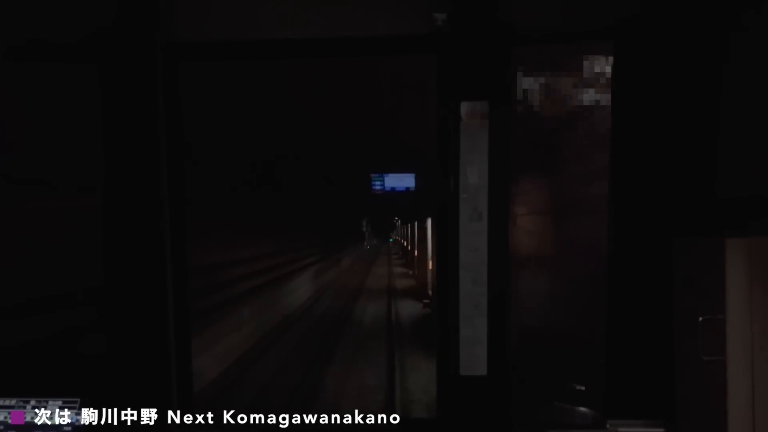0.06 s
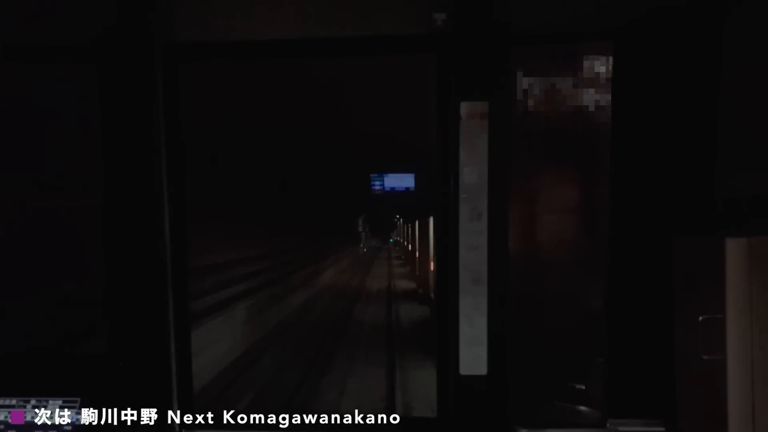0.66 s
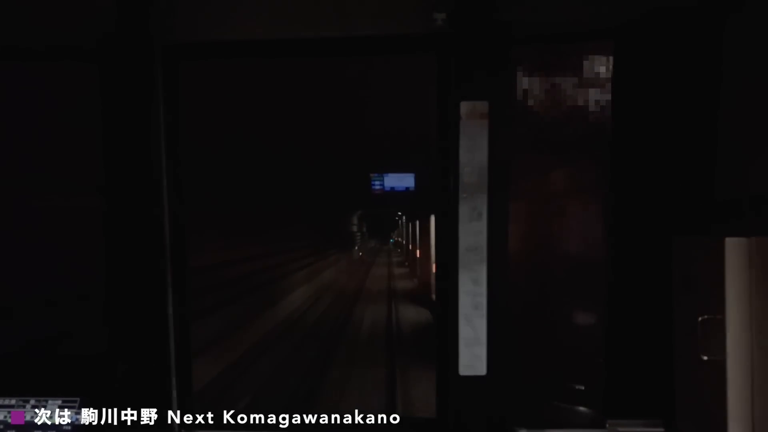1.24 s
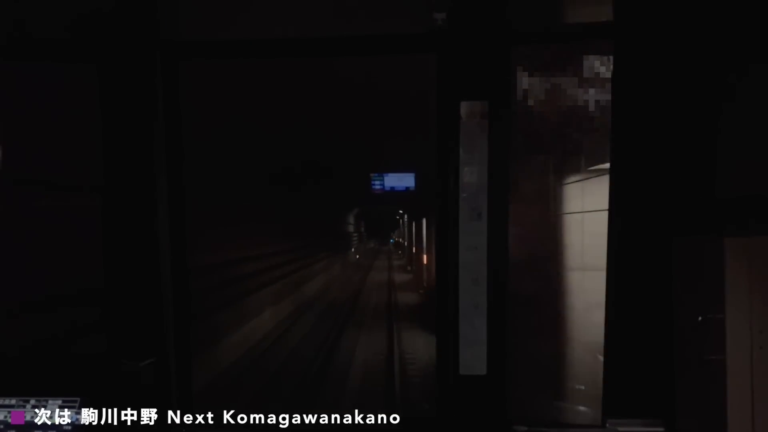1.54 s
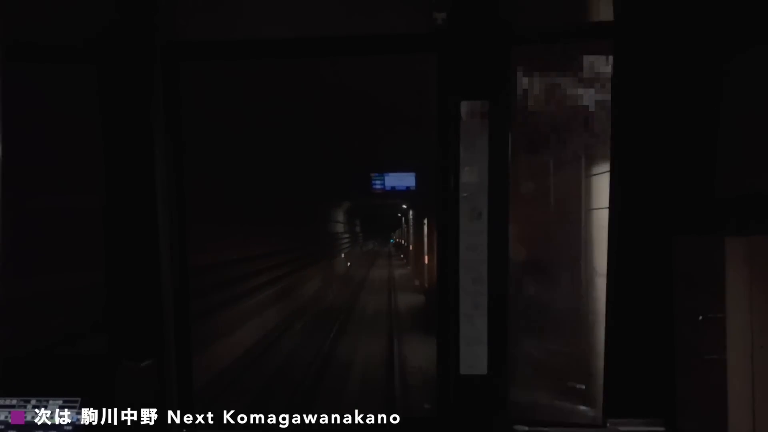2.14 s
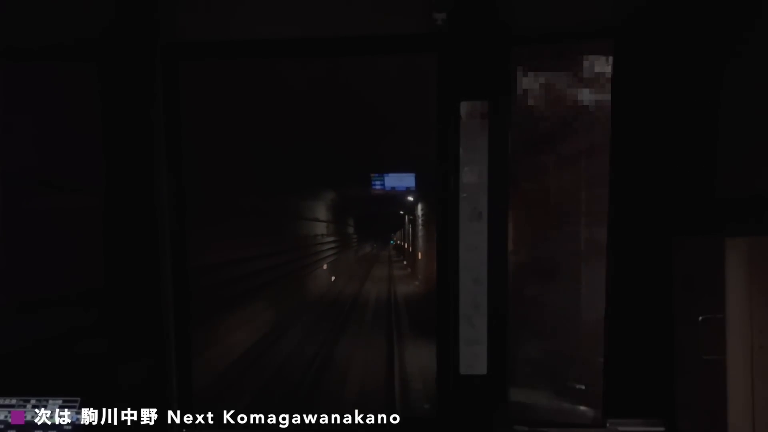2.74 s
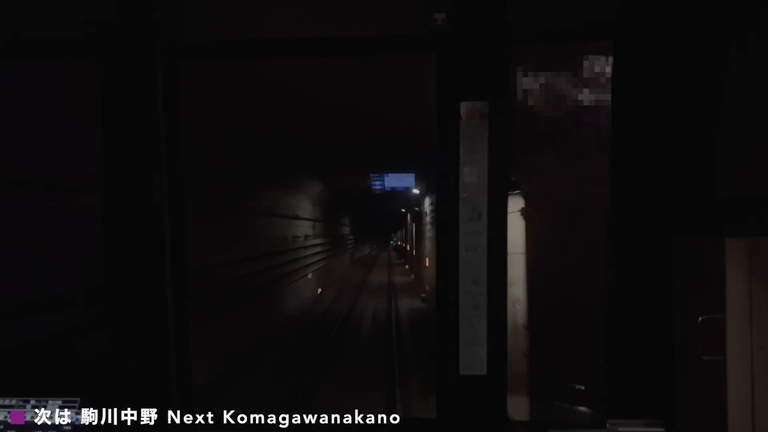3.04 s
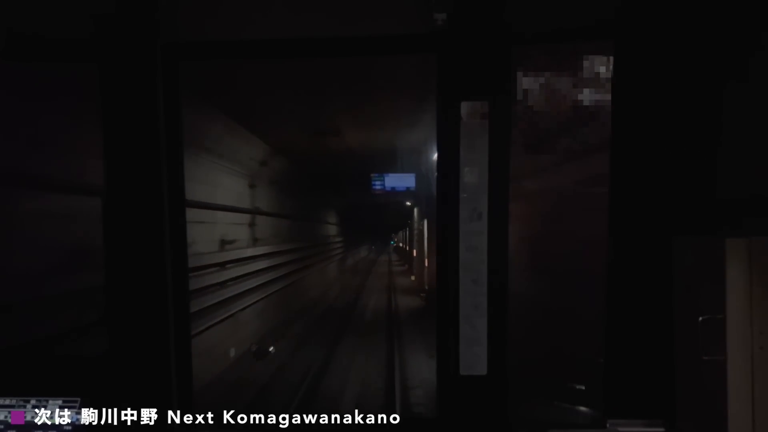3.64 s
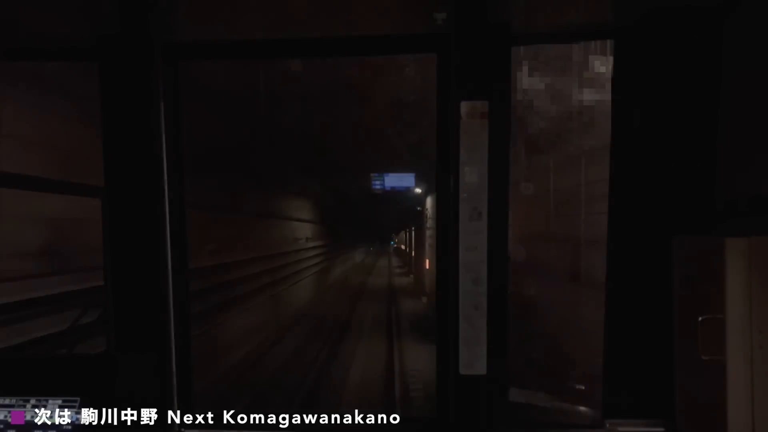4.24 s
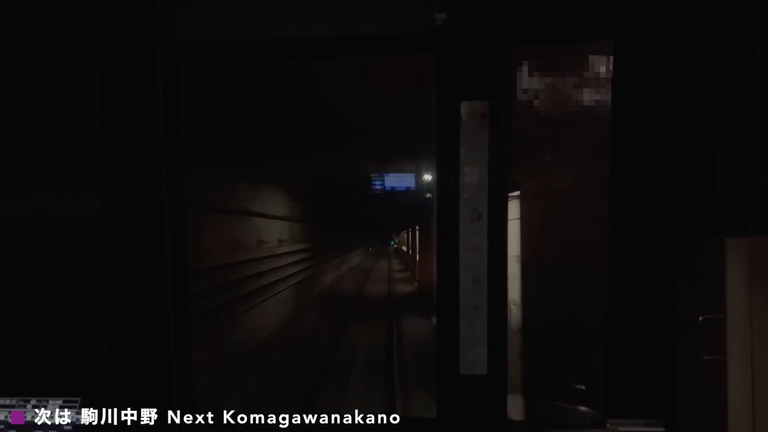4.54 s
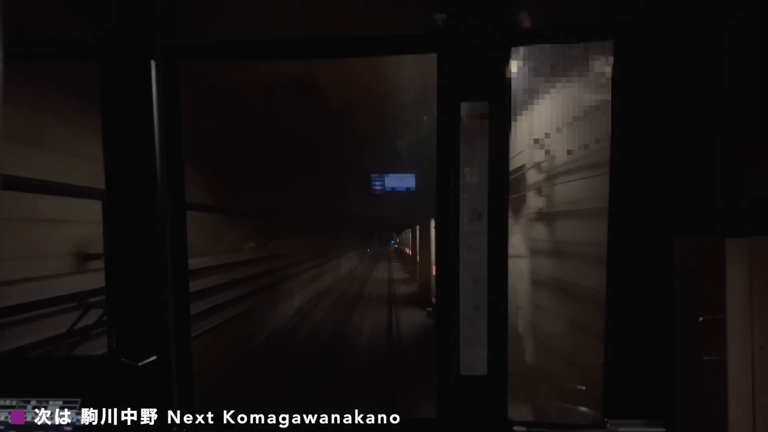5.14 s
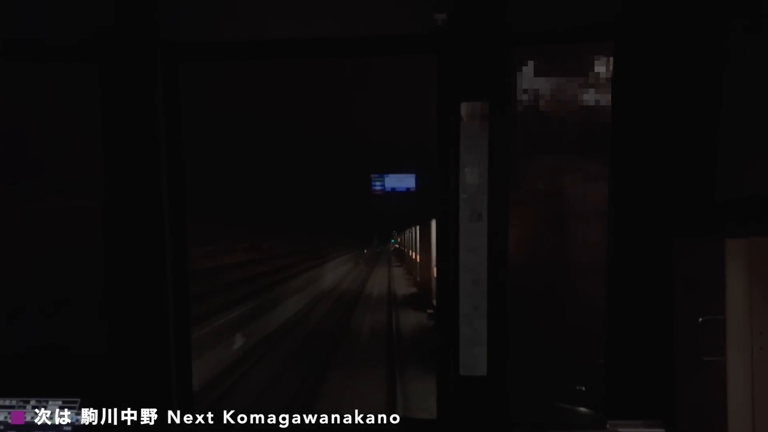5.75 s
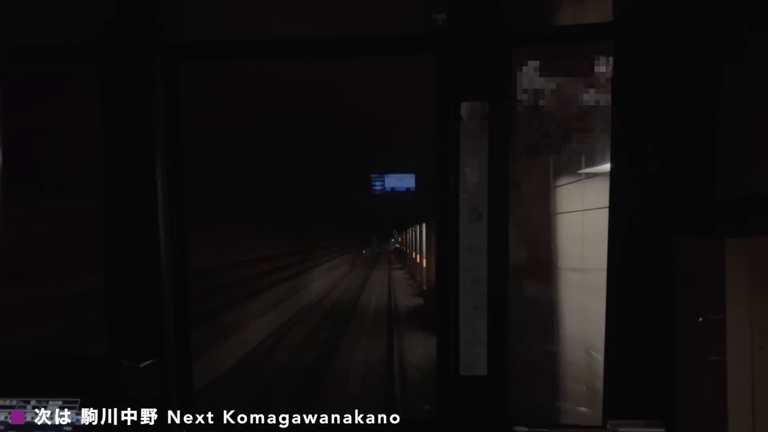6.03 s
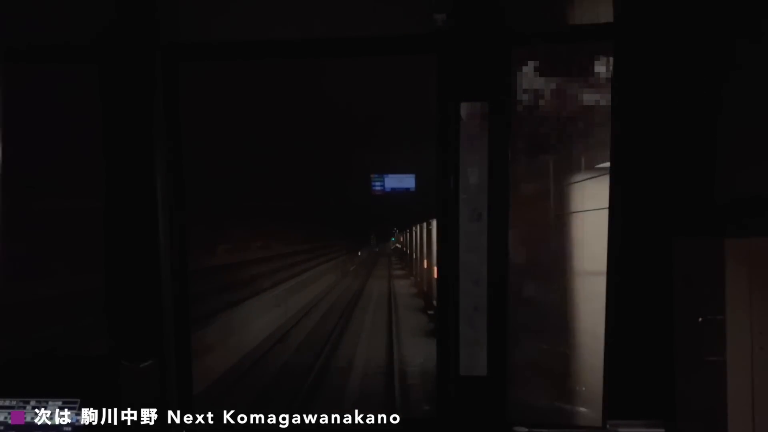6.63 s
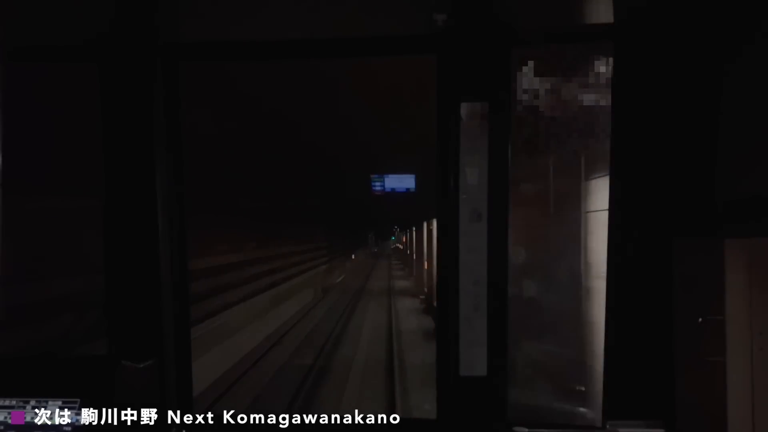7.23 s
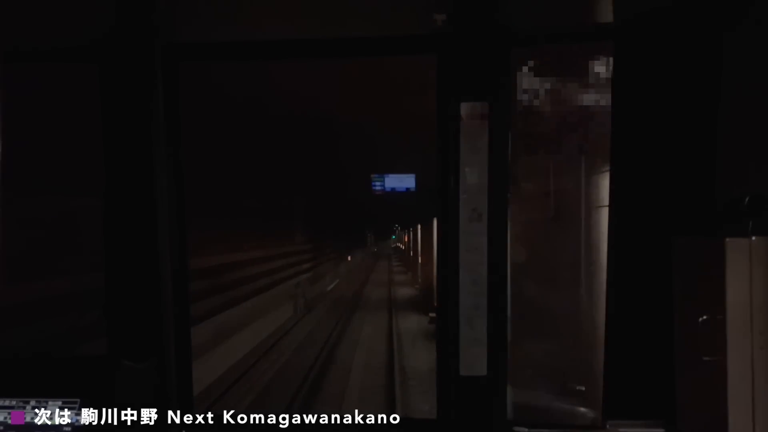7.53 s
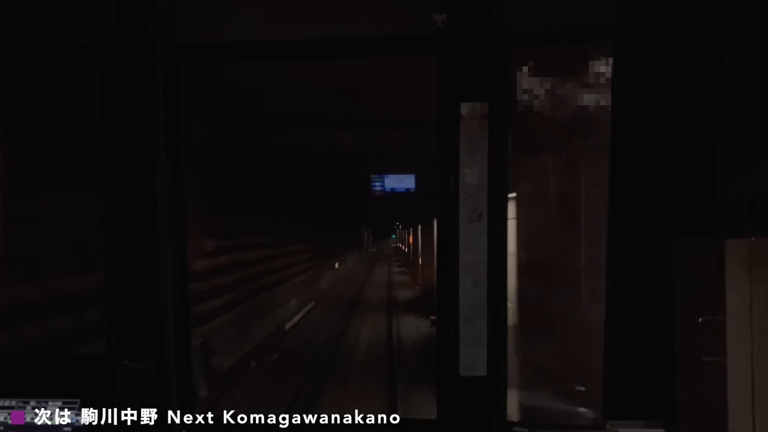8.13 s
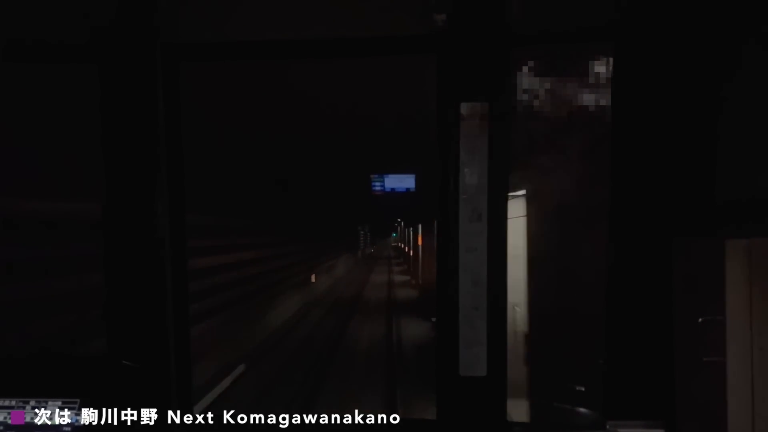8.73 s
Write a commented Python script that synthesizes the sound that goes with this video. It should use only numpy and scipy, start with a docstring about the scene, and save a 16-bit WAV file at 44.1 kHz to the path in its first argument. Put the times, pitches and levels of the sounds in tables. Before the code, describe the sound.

A subway train runs steadily through a tunnel for about nine seconds, heard from inside the front car. A loud, deep rumble and throbbing boom continue throughout, pulsing more strongly around 0.6, 1.1, 1.8, 5.7 and 8.5 seconds. Over them sit an even tunnel roar and a wavering, medium-low gear whine, which swells into brief clear notes near 0.7, 2.3, 5.2 and just after 8 seconds. The wheels thump unevenly over rail joints, lightly through the first 2.6 seconds, then in two hard, quick clusters at about 3.8 and 5.6 seconds. Softer knocks follow until around 7.6 seconds. Now and then the wheels brush the rail with a faint hiss, and there are slight metallic squeaks near 1, 3.2 and 3.9 seconds. A very faint, thin electrical whistle stays high above the rumble, and the train never slows.

```python
"""Subway car in a tunnel

Inside the front car, running steadily. Rough rails shake it into a deep, throbbing boom and a rumble,
with the whine of the running gear and the roar of the tunnel on top.
The wheels thump over rail joints and now and then brush the rail with a hiss or a faint squeak.
A limiter holds the loudest thumps."""
import sys
import numpy as np
from scipy import signal
from scipy.fft import rfft, irfft
from scipy.io import wavfile
from scipy.ndimage import uniform_filter1d, minimum_filter1d

SR = 44100
rng = np.random.default_rng(int(sys.argv[2]) if len(sys.argv) > 2 else 0)


def file_out(sig):
    """Save sig as 16-bit WAV at sys.argv[1]."""
    # one column per channel
    cols = np.atleast_2d(sig).T
    # limit, then scale
    lim = np.clip(cols, -1, 1)
    pcm = np.round(lim * 32767).astype(np.int16)
    wavfile.write(sys.argv[1], SR, pcm)


N = 391608
T = np.arange(N) / SR
HZ = np.fft.rfftfreq(N, 1 / SR)

# Table levels are relative: each layer adds its own trim.
# air modes of the car: (frequency [Hz], width [Hz], level [dB])
AIR_MODES = [(59.6, 12, -0.5), (69.76, 5.9, 6)]
# broad skirt around the air modes: (frequency [Hz], level [dB])
BOOM_EQ = [(10, -38.5), (20, -45.5), (33, -25.5), (45, -26), (80, -10.5), (105, -37.5), (160, -51.5),
           (400, -99)]
# swell of the boom as the track shakes the car: (time [s], level [dB])
BOOM_ENVELOPE = [(0.0, -12.5), (0.7, -15), (0.95, -17.5), (1.15, -9), (1.35, -21), (1.5, -16), (1.68, -19),
                 (2.1, -13.5), (2.33, -19.5), (2.6, -15), (3.4, -17.5), (3.6, -14.5), (4.0, -17),
                 (4.15, -18.5), (4.4, -18), (5.29, -19), (5.45, -16.5), (6.15, -20.5), (6.4, -20.5),
                 (7.6, -17.5), (7.73, -20), (7.9, -18.5), (8.88, -13.5)]
# throbs of the boom, brief swells of the car's deep hum: (peak time [s], level [dB])
BOOM_THROBS = [(0.179, -15.5), (.6, -6), (1.1, -8), (1.28, -12), (1.791, -5), (2.46, -8.5), (2.58, -14),
               (2.81, -12.5), (4.409, -15), (4.56, -17), (5.36, -16), (5.691, -5), (5.8, -6), (5.89, -12.5),
               (6.182, -9), (7.17, -8), (7.35, -6.5), (7.6, -8), (8.3, -14), (8.49, -3.5)]
# rumble, following the roughness of the rails: (time [s], level [dB])
RUMBLE_ENVELOPE = [(0.0, -21), (0.96, -15.5), (1.48, -23.5), (1.68, -17.5), (2.0, -21.5), (2.56, -17.5),
                   (2.92, -22), (3.2, -18.5), (3.76, -22), (3.88, -20), (4.24, -22.5), (4.4, -19.5),
                   (4.84, -21), (6.24, -21.5), (6.52, -24), (6.64, -21), (8.76, -19.5), (8.88, -16.5)]
# tone of the rumble: (frequency [Hz], level [dB])
RUMBLE_EQ = [(50, -37), (85, 5.5), (110, 1.5), (135, -1), (200, -2.5), (260, -4), (340, -5), (440, -13),
             (510, -15.5), (640, -16), (900, -17), (1400, -29.5), (2200, -35.5), (5000, -77)]
# panel and floor resonances: (frequency [Hz], width [Hz], level over the rumble [dB])
PANEL_MODES = [(93, 12, 0), (150, 10, 3), (167, 11, 4.5), (312, 14, 0), (470, 22, 2.5), (550, 20, 2),
               (635, 30, 1)]
# wheels striking rail joints: (time [s], force [dB], hardness as a corner frequency [Hz])
JOINT_HITS = [(.238, -15, 970), (.252, -11.5, 448), (0.361, -11, 327), (0.508, -12, 377), (.783, -17, 446),
              (0.899, -19.5, 910), (1.004, -6.5, 268), (1.06, -15.5, 800), (1.694, -18.5, 394),
              (2.132, -11, 330), (2.457, -21, 380), (2.516, -18, 354), (2.566, -10.5, 278),
              (3.8155, -1, 674), (3.831, -2, 1136), (3.8455, -7.5, 338), (3.895, -9.5, 256),
              (5.128, -21.5, 484), (5.598, 0, 620), (5.6146, -2, 1390), (5.629, -3.5, 432),
              (5.748, -9.5, 419), (5.798, -11.5, 446), (5.831, -9, 293), (6.127, -11, 289),
              (6.175, -15.5, 292), (6.823, -14, 390), (7.515, -14.5, 322), (7.567, -8.5, 345),
              (8.438, -18, 650)]
# ring of a struck wheel truck: (frequency [Hz], level [dB], 60 dB decay time [s])
TRUCK_MODES = [(95.6, -2, 0.18), (151, 0.5, 0.13), (186.5, -2, 0.22), (224, -3, 0.071), (314.3, -2, 0.19),
               (397, -1, 0.079), (435, 0, 0.1), (464.4, 2.5, 0.091), (556, -6, 0.2), (596, -8, 0.15),
               (795, -9, 0.075), (1163, -4, 0.048), (1310, -9, 0.03), (1480, -6, 0.027), (1870, -11, 0.025),
               (2290, -10.5, 0.025), (2710, -13, 0.025)]
# running gear resonances: (frequency [Hz], width [Hz], level [dB])
GEAR_MODES = [(255, 13, -2.5), (378, 8, -.5), (393, 10, 1), (424, 12, -2)]
# swell of the whine: (time [s], level [dB])
WHINE_ENVELOPE = [(0.0, -28), (1.3, -27), (1.5, -33.5), (1.96, -37.5), (2.2, -26), (2.6, -24.5), (3.0, -31),
                  (3.16, -23.5), (3.36, -31.5), (3.72, -25), (4.16, -35), (4.32, -28), (5.24, -28),
                  (5.52, -32.5), (6.16, -32.5), (6.36, -47), (6.64, -28), (6.84, -33.5), (7.45, -28.5),
                  (7.56, -40), (7.7, -27), (8.64, -25), (8.88, -33)]
# clear notes in the whine: (peak time [s], half length [s], pitch [Hz], level [dB])
WHINE_NOTES = [(0.484, .03, 400, -19.5), (0.672, 0.019, 385.6, -13), (0.905, 0.043, 394, -20),
               (2.315, 0.051, 375.6, -17), (3.132, .055, 388.8, -22.5), (3.721, 0.053, 384, -20.5),
               (4.04, 0.042, 390.7, -22.5), (4.352, 0.088, 385, -25), (4.755, 0.2, 391.7, -22),
               (5.15, 0.053, 391, -15.5), (7.372, .07, 379.4, -20.5), (8.124, 0.081, 386, -18),
               (8.287, 0.048, 424, -28), (8.546, 0.085, 378.3, -18), (8.678, 0.093, 399.3, -31)]
# shudders of the car body: (peak time [s], half length [s], level [dB])
SHUDDERS = [(4.75, 0.31, -23), (8.343, 0.18, -22.5)]
# swell of the rolling noise in the tunnel: (time [s], level [dB])
ROAR_ENVELOPE = [(0.0, -34.5), (0.8, -37), (0.92, -34.5), (1.08, -31.5), (1.2, -35.5), (3.96, -33),
                 (4.16, -34.5), (4.52, -33), (4.68, -34), (6.0, -34), (6.84, -34), (8.88, -33.5)]
# tone of the roar: (frequency [Hz], level [dB])
ROAR_EQ = [(200, -25.5), (500, -2.5), (750, -1.5), (1000, 0.5), (1250, -3), (1600, -7.5), (1950, -12),
           (2450, -18), (3200, -23.5), (5000, -37.5), (9000, -50.5), (15000, -76)]
# a broad, sinking band in the roar: (time [s], centre [Hz], level against the roar [dB])
ROAR_BAND = [(0, 1513, -8), (1.6, 1418, -9.5), (2.4, 1371, -11), (3.4, 1264, -13.5), (4.5, 1386, -10),
             (6, 1223, -21), (7.3, 1178, -8.5), (7.9, 1309, -8.5), (8.2, 1060, -7), (8.9, 1144, -7)]
# steel wheels ringing as they roll: (frequency [Hz], width [Hz], level over the noise [dB])
WHEEL_MODES = [(830, 22, -1), (1400, 50, -5), (1630, 30, -4), (1750, 30, -3), (2160, 40, -2),
               (3000, 90, -0.5), (4560, 60, -3), (5550, 70, 0), (8000, 80, -1)]
# a wheel leans on the rail and brushes it: (start [s], length [s], level [dB])
BRUSHES = [(0.21, 0.067, -54), (0.457, 0.076, -56), (0.867, 0.15, -50), (1.035, 0.09, -45.5),
           (2.34, 0.18, -53), (3.15, 0.071, -46.5), (3.25, 0.069, -51), (3.567, 0.29, -50.5),
           (3.867, 0.091, -49.5), (4.48, .07, -55), (5.114, 0.07, -53), (5.69, 0.072, -57),
           (7.53, 0.048, -54), (7.9, 0.32, -54), (8.386, .09, -52)]
# tone of sliding steel: (frequency [Hz], level [dB])
BRUSH_EQ = [(1000, -19), (2200, 1.5), (3000, 3.5), (3900, -1), (4600, -1), (5350, -7), (5700, -6),
            (6900, -7.5), (7700, -15.5), (8200, -13), (9700, -19), (11200, -42), (13700, -25), (15700, -39)]
# wheel flange squeaks: (peak time [s], length [s], pitch [Hz], level [dB])
SQUEAKS = [(1.034, .008, 8600, -49), (1.07, 0.17, 3800, -54), (3.172, 0.11, 1980, -39.5),
           (3.21, .16, 3780, -58), (3.92, 0.11, 3550, -52)]
# whistles of the drive electronics: (frequency [Hz], width [Hz], level [dB])
DRIVE_WHISTLES = [(6583, 50, 0), (9520, 20, -8), (9662, 20, -6)]
# how alike the two microphones sound: (frequency [Hz], coherence [ratio, capped at 1])
STEREO_COHERENCE = [(60, 1), (150, 0.8), (260, 1), (380, 0.63), (480, 0), (800, 0.58), (1200, 1.1),
                    (2000, 0), (7000, 0.02), (10000, 0)]
# how far the left microphone leads: (frequency [Hz], phase [rad])
STEREO_LEAD = [(30, .05), (70, .33), (110, .33), (250, .15), (390, .6), (450, 1.1), (570, 2.3), (800, 3.5),
               (1100, 5), (1500, 4.9), (2000, 6.28)]
# balance of the microphones: (frequency [Hz], left minus right [dB])
STEREO_BALANCE = [(60, 1.8), (170, 0), (250, 4), (330, 3.5), (470, 3.5), (660, 2), (1100, 1), (1400, 6),
                  (2200, 0.5), (3000, 3), (4600, 6.5), (6700, 6), (9500, 0), (13000, 0.5)]


def boom(trim_db=3.0, low_cut_hz=45, waver_db=2.0, waver_hz=8):
    """The air in the car booms and wavers in its lowest modes and carries little below them."""
    colour = np.sqrt(resonances(AIR_MODES) + amp(spectrum(BOOM_EQ)) ** 2)
    swell_db = curve(BOOM_ENVELOPE) + waver_db * drift(waver_hz)
    air = steadied(noise(colour), seconds=0.13) * amp(swell_db + trim_db)
    return irfft(rfft(air) * HZ ** 2 / np.sqrt(HZ ** 4 + low_cut_hz ** 4), N)


def boom_throbs(trim_db=2.0, pitch_hz=70, scatter_hz=2, half_s=0.037):
    """The car's deep hum swells for a few cycles at a time, near its main air mode."""
    out = np.zeros(N)
    for (s, db), (detune, phase) in zip(BOOM_THROBS, rng.uniform(-1.09, 1, (len(BOOM_THROBS), 2))):
        hum = np.sin(2 * np.pi * (pitch_hz + scatter_hz * detune) * (T - s) + np.pi * phase)
        out += amp(db) * bell(s, half_s) * hum
    return microphones(rfft(out), rfft(out)) * amp(trim_db)


def rumble(trim_db=0.99, judder_db=3.5, judder_hz=26, judder_below_hz=380):
    """Rail roughness comes through the floor and panels; the low end judders."""
    body = resonant_noise(RUMBLE_EQ, PANEL_MODES)
    low_end = irfft(rfft(body) / (1 + (HZ / judder_below_hz) ** 4), N)
    shaken = unit(body + low_end * (amp(judder_db * drift(judder_hz)) - 1))
    return steadied(shaken, seconds=0.45) * amp(curve(RUMBLE_ENVELOPE) + trim_db)


def joint_thumps(trim_db=-3, crack_db=-12, crack_s=0.011, snap_db=-3, snap_s=0.0004,
                 rise_cycles=0.9, echo_db=-17, echo_t60=0.16):
    """Each rail joint snaps and rings the truck, a hard hit faster and brighter; the car echoes it."""
    t = np.arange(SR // 2) / SR
    hz, mode_db, t60 = np.transpose(TRUCK_MODES)[:, :, None]
    signs = (-1.) ** np.arange(len(hz))[:, None]  # neighbouring modes swing opposite ways
    modes = signs * amp(mode_db - 60 * t / t60) * np.sin(2 * np.pi * hz * t)
    hits = np.zeros(N)
    for s, force_db, corner_hz in JOINT_HITS:
        ring = (modes / np.sqrt(1 + (hz / corner_hz) ** 4)).sum(0)  # soft hits barely ring high modes
        grit = signal.lfilter(*signal.butter(4, corner_hz, fs=SR), rng.standard_normal(len(t)))
        crack = amp(crack_db) * grit / grit.std() * np.exp(-t / crack_s)
        phase = 2 * np.pi * corner_hz * t
        snap = amp(snap_db) * np.sin(phase) * np.exp(-t / snap_s) * (1 - np.exp(-phase))
        attack = 1 - np.exp(-t * corner_hz / rise_cycles)
        add(hits, s, amp(force_db) * (snap + (ring + crack) * attack))
    tail = rng.standard_normal((2, len(t))) * amp(-60 * t / echo_t60)
    direct = microphones(rfft(hits), rfft(hits))
    echo = signal.fftconvolve(direct, tail / np.linalg.norm(tail[0]), axes=1)[:, :N]
    return amp(trim_db) * (direct + amp(echo_db) * echo)


def gear_whine(trim_db=2.0, waver_db=1, waver_hz=9):
    """The running gear keeps a few narrow resonances singing; their level wavers."""
    singing = steadied(noise(np.sqrt(resonances(GEAR_MODES))), seconds=0.19)
    return singing * amp(curve(WHINE_ENVELOPE) + trim_db + waver_db * drift(waver_hz))


def whine_notes(trim_db=1.0, fifth_db=-6, wander_hz=6, wander_rate_hz=20):
    """Now and then the whine swells into a nearly pure note, with a weaker one a fifth below."""
    wander_cycles = wander_hz * np.cumsum(drift(wander_rate_hz)) / SR
    out = np.zeros(N)
    for s, half_s, hz, db in WHINE_NOTES:
        phase = 2 * np.pi * (hz * T + wander_cycles)
        tone = np.sin(phase) + amp(fifth_db) * np.sin(phase * 2 / 3)
        out += amp(db) * bell(s, half_s) * tone
    return microphones(rfft(out), rfft(out)) * amp(trim_db)


def shudder(pitch_hz=54, width_hz=9):
    """The car body flexes in slow swells, pitched below the boom."""
    flexing = steadied(noise(np.sqrt(resonances([(pitch_hz, width_hz, 0)]))), seconds=0.18)
    return flexing * sum(amp(db) * bell(s, half_s) for s, half_s, db in SHUDDERS)


def tunnel_roar(trim_db=-0.9, band_spread_hz=105, band_pan_db=2, flutter_db=1.23, flutter_hz=31):
    """The tunnel throws back the rolling noise, louder on rough rail; one band in it slowly sinks."""
    wash = resonant_noise(ROAR_EQ, WHEEL_MODES)
    low_noise = irfft(rfft(rng.standard_normal((2, 2, N))) / (1 + (HZ / band_spread_hz) ** 2), N)
    phase = 2 * np.pi * np.cumsum(curve(ROAR_BAND)) / SR
    band = unit(low_noise[0] * np.cos(phase) + low_noise[1] * np.sin(phase))  # shifted up to the centre
    band *= amp(curve(ROAR_BAND, column=2)) * amp([[band_pan_db], [-band_pan_db]])
    swell_db = curve(ROAR_ENVELOPE) + 0.2 * roughness_db() + flutter_db * drift(flutter_hz)
    return (wash + band) * amp(swell_db + trim_db)


def wheel_brushes(trim_db=4.5, bed_db=-53, attack_s=0.016, release_s=0.026,
                  grain_db=0.87, grain_hz=31):
    """Steel slides on steel: a grainy bed of hiss, louder on rough rail, that flares at each brush."""
    power = amp(bed_db + 0.43 * roughness_db()) ** 2
    for start, length, db in BRUSHES:
        attack = np.clip((T - start) / attack_s, 0, 1)
        release = np.exp(-np.maximum(T - start - length, 0) / release_s)
        power += (amp(db) * attack * release) ** 2
    hiss = resonant_noise(BRUSH_EQ, WHEEL_MODES)
    return hiss * np.sqrt(power) * amp(trim_db + grain_db * drift(grain_hz))


def flange_squeaks(spread_hz=120):
    """A flange catches the rail and scrapes briefly around one note."""
    out = np.zeros((2, N))
    grain = np.array([drift(spread_hz) + 1j * drift(spread_hz) for side in out])
    for s, length, hz, db in SQUEAKS:
        on = abs(T - s) < length / 2
        swell = np.cos(np.pi * (T[on] - s) / length)
        scrape = (grain[:, on] * np.exp(2j * np.pi * hz * T[on])).real
        out[:, on] += amp(db) * swell * scrape
    return out * amp([[4], [1]])  # leaning left


def drive_whistles(level_db=-72):
    """The drive electronics whistle, thin and steady, high above the roar."""
    return noise(np.sqrt(resonances(DRIVE_WHISTLES))) * amp(level_db)


def roughness_db():
    """How much rougher than usual the rail is under the wheels."""
    level_db = curve(RUMBLE_ENVELOPE)
    return level_db - level_db.mean()


def amp(db):
    """Decibels to gain."""
    return 10 ** (np.asarray(db) / 20)


def unit(x):
    """Scales a stereo sound so that its mid channel has rms 1."""
    return x / np.sqrt(np.mean(x.mean(0) ** 2) + 1e-20)


def bell(s, half_s):
    """A smooth swell that peaks at time s and is down to 1/e at half_s either side."""
    return np.exp(-((T - s) / half_s) ** 2)


def curve(rows, column=1):
    """One column of a time table at every sample."""
    rows = np.asarray(rows)
    return np.interp(T, rows[:, 0], rows[:, column])


def spectrum(points):
    """A table over frequency, joined on a log axis."""
    hz, value = np.transpose(points)
    return np.interp(np.log(HZ + 1), np.log(hz + 1), value)


def resonances(modes):
    """Power response of a set of steep-sided peaks."""
    return sum(amp(db) ** 2 / (1 + ((HZ - hz) / (.78 * width)) ** 2) ** 2 for hz, width, db in modes)


def microphones(left, right):
    """Two spectra become sound, with the lead and balance of the microphone pair."""
    tilt = amp(spectrum(STEREO_BALANCE) / 2)
    lag = np.exp(-1j * spectrum(STEREO_LEAD))
    return irfft(np.array([left * tilt, right / tilt * lag]), N)


def noise(colour):
    """Diffuse coloured noise: narrow in the bass, wide in the treble."""
    left, independent = rfft(rng.standard_normal((2, N)))
    coherence = np.clip(spectrum(STEREO_COHERENCE), 0, 1)
    right = coherence * left + np.sqrt(1 - coherence ** 2) * independent
    return unit(microphones(colour * left, colour * right))


def resonant_noise(eq, modes):
    """Broad noise with resonances standing out of it."""
    return noise(amp(spectrum(eq)) * np.sqrt(1 + resonances(modes)))


def drift(rate_hz):
    """Smooth random modulation of rms near 1, its extremes rounded off."""
    slow = irfft(rfft(rng.standard_normal(N)) / (1 + (HZ / rate_hz) ** 4), N)
    return 2 * np.tanh(slow / slow.std() / 2)


def steadied(x, seconds):
    """Evens out the slow swells of a noise and keeps its quick flutter."""
    size = max(int(seconds * SR / 2), 2)
    power = uniform_filter1d(uniform_filter1d(x.mean(0) ** 2, size), size)
    return x / np.sqrt(abs(power) + .04)


def add(mix, s, sound):
    """Mixes a short sound in at time s."""
    part = mix[max(round(s * SR), 0):][:len(sound)]
    part += sound[:len(part)]


def scene():
    """The full mix, heard behind the cab."""
    lows = boom() + boom_throbs() + shudder() + rumble()
    mids = gear_whine() + whine_notes() + tunnel_roar()
    highs = wheel_brushes() + drive_whistles() + flange_squeaks()
    return lows + mids + highs + joint_thumps()


def record(dry, threshold_db=0.7, release_db_per_s=800, high_cut_hz=15750):
    """A fast limiter holds peaks near full scale, the overshoot clips, and a high cut follows."""
    over_db = np.maximum(20 * np.log10(abs(dry).max(0) + 1e-9) - threshold_db, 0)
    release_db = T * release_db_per_s
    reduction_db = np.maximum.accumulate(over_db + release_db) - release_db
    gain = uniform_filter1d(minimum_filter1d(amp(-reduction_db), size=31), size=31)
    high_cut = signal.firwin(511, high_cut_hz, window=("kaiser", 9), fs=SR)
    return signal.oaconvolve(np.clip(dry * gain, -1, 1), high_cut[None], "same")


dry = scene()
out = record(dry)
file_out(out)
```